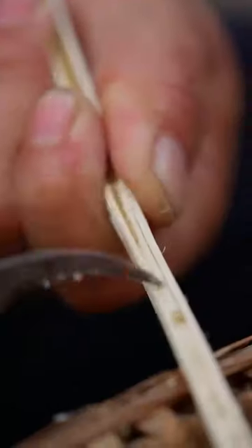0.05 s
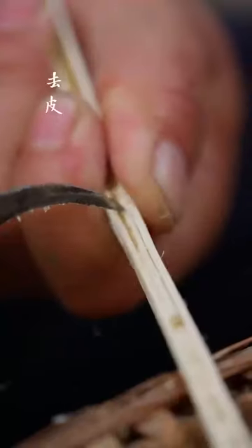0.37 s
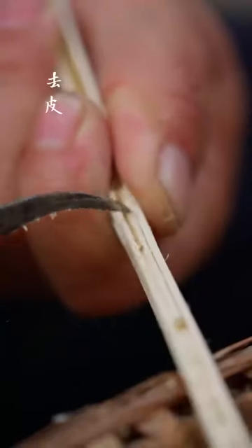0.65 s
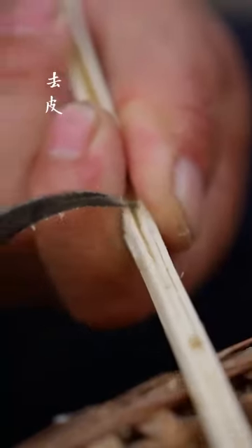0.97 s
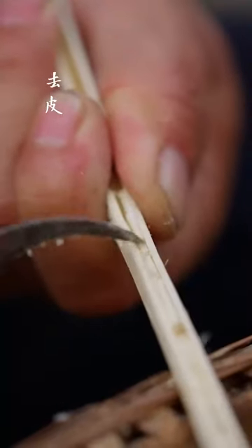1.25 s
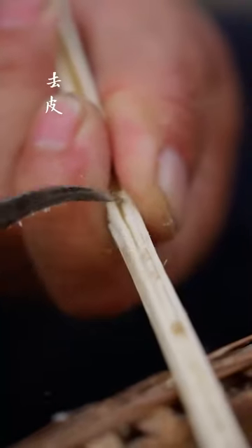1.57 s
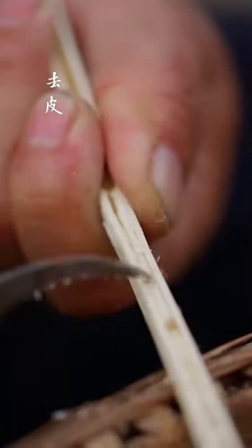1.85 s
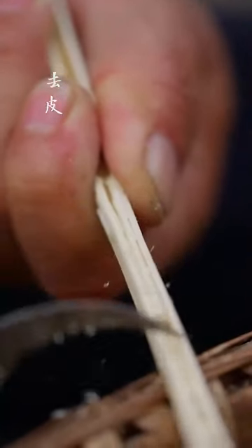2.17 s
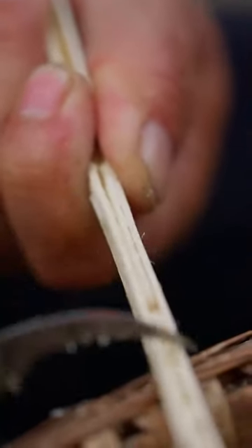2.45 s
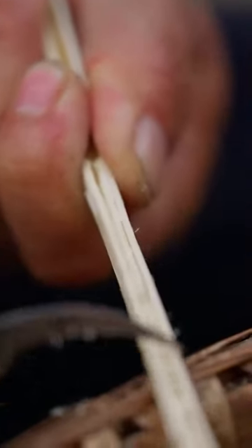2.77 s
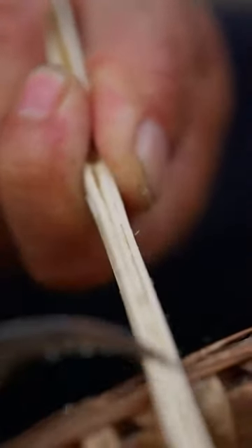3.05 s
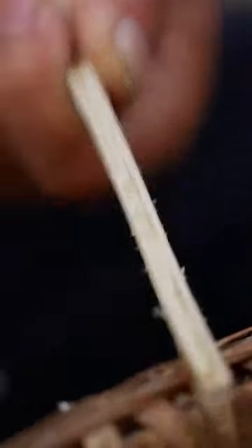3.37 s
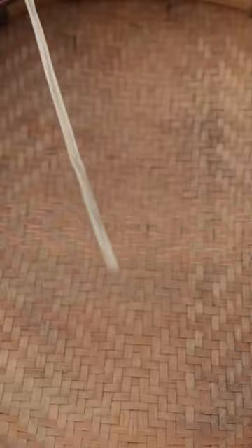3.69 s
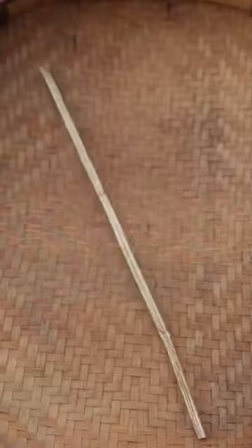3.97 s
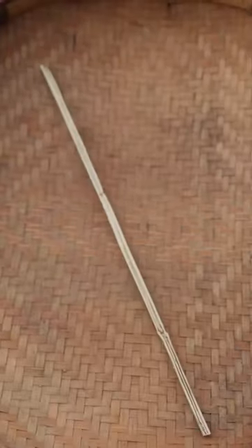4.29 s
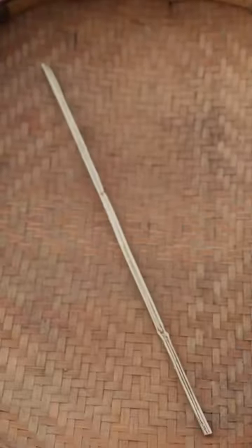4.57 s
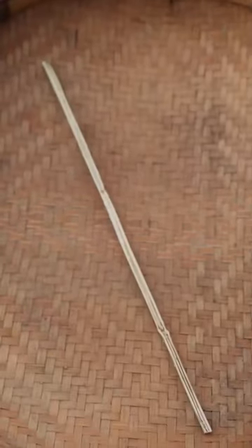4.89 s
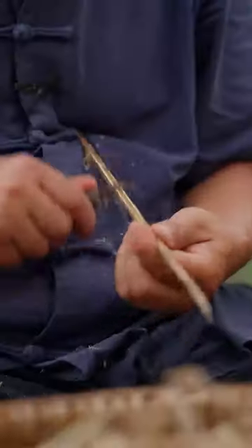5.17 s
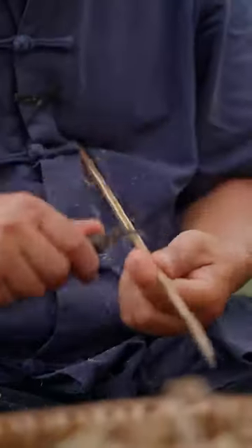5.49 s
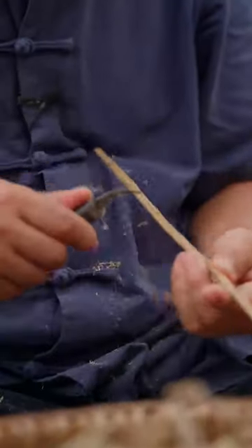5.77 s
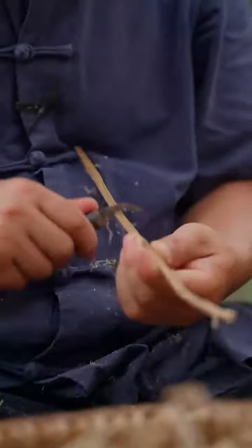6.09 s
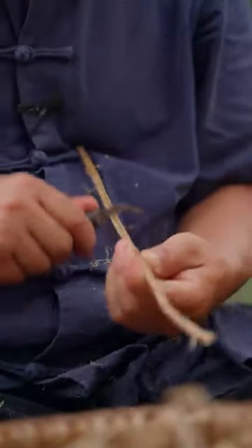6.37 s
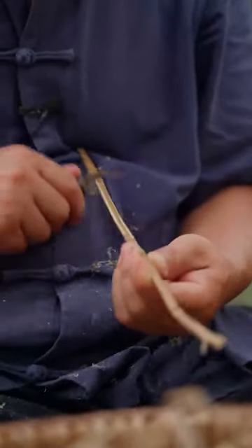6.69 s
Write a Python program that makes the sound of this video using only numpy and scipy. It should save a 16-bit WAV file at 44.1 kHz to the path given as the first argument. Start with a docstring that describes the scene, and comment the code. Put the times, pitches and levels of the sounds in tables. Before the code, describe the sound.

Small birds chirp in quick series over close, short knife scrapes on a dry stalk, with one sharp clack midway.

```python
"""Shaving a stalk under songbirds

Outdoors, close to the microphone, a small curved knife shaves a dry stalk, tearing and snapping fibres.
The peeled stalk drops on a woven tray with a sharp clack and a rattle; then longer strokes scrape
another stalk and make it groan. Farther off, songbirds whistle in the trees, their notes scattering
back from the foliage over a soft outdoor hiss."""
import sys
import numpy as np
from scipy import signal
from scipy.fft import rfft, irfft, next_fast_len
from scipy.io import wavfile
from scipy.ndimage import uniform_filter1d, map_coordinates

SR = 44100
rng = np.random.default_rng(int(sys.argv[2]) if len(sys.argv) > 2 else 0)


def bounce(signal):
    """Save signal as a 16-bit WAV file at the path given by the first command-line argument."""
    frames = np.transpose(np.atleast_2d(signal))
    limited = np.clip(frames, -1, 1)
    pcm = np.round(limited * 32767).astype(np.int16)
    wavfile.write(sys.argv[1], SR, pcm)


N = 306054
TIME = np.arange(N) / SR

# Outdoor hiss behind the shaving, the drop and the long strokes. Each row: frequency in Hz, gain in dB.
SHAVING_AIR_COLOUR = [(30, -19), (110, -9.5), (300, -9.5), (700, -12), (1100, -17), (2000, -11),
                      (2800, -3.5), (4300, 0.5), (5600, 0), (7000, 1), (8000, -6.5), (9300, -4),
                      (11000, -12.5), (15500, -18)]
DROP_AIR_COLOUR = [(35, -68), (60, -38), (272, -18), (521, -17), (559, -15.5), (738, -6), (849, -4),
                   (1120, -2.5), (2310, -9), (3270, -3.5), (4320, -3), (4850, -0.5), (5710, -7), (6410, -4),
                   (15500, -25)]
STROKING_AIR_COLOUR = [(60, -52.5), (150, -16.5), (300, -10), (600, -7), (1000, 3.5), (2200, 1), (3200, 1),
                       (5000, 8), (7000, 3), (9300, -3.5), (11000, -11), (15500, -23.5)]
# How each hiss comes and goes. Each row: time in seconds, level in dB.
SHAVING_AIR_LEVEL = [(0, -46.5), (1.9, -49.2), (2.7, -48), (3.56, -48.5), (3.57, -88.5)]
DROP_AIR_LEVEL = [(3.555, -83.5), (3.567, -42), (4.3, -41.5), (4.6, -43.5), (5.1, -42), (5.35, -43),
                  (5.6, -58)]
STROKING_AIR_LEVEL = [(5.1, -56), (5.3, -45), (5.8, -47.3), (6.1, -47.5), (6.3, -43), (6.94, -44.5)]
# Swells of thin, high hiss. Each row: peak time in seconds, half-width in seconds, level in dB.
HISS_SWELLS = [(4.34, 0.095, -49), (5.17, 0.089, -47), (5.913, 0.11, -48), (6.70, 0.11, -51)]

# Bird syllables. Each point: offset in seconds, base pitch in Hz, relative level in dB.
SYLLABLES = { "arch": [(-.05, 3500, -19.5), (-.023, 4020, -12), (-.014, 4380, 0), (0, 4700, 2),
             (.011, 4350, -6), (.023, 3400, -23)], "dome": [(-.017, 3844, -15), (-.010, 4400, 0),
             (0, 4670, 1.5), (.011, 4420, -1), (.024, 3600, -13)], "plateau": [(-.016, 4100, -12),
             (-.008, 4520, 0), (0, 4670, 1.5), (.014, 4560, -1), (.026, 4400, -12)],
             "hook": [(-.026, 2920, -5.5), (-.010, 3150, 4.5), (0, 3370, 2), (.009, 3150, -4)],
             "zigzag": [(0, 5800, -13), (.02, 6550, -7), (.04, 6550, -4), (.054, 5900, -4.5),
             (.068, 5680, -5), (.075, 5600, -13)], "warble": [(0, 5950, -14), (.015, 6950, 4),
             (.025, 6400, -8), (.034, 7300, -12), (.061, 7500, -13), (.070, 6650, -1.5), (.083, 5850, -3),
             (.101, 5620, -6), (.111, 5600, -20)], "tsip": [(-.040, 6990, -6), (-.028, 7700, -7),
             (-.019, 7300, -3), (-.013, 5010, -32.5), (-.006, 5770, -3.5), (0, 6950, 2.5),
             (.008, 5820, -3.5), (.014, 5780, -22)], "tick": [(-.016, 4556, -9), (-.007, 4950, -4),
             (0, 6150, 1.5), (.005, 5470, 0)], "slur": [(-.046, 6900, -10), (-.031, 6400, -3),
             (-.022, 5500, -3), (-.012, 4450, -3.5), (0, 3436, -11), (.011, 4583, -8), (.016, 4610, -5),
             (.021, 4500, -13)], "chip": [(-.014, 3820, -3), (-.005, 3450, 2.5), (.006, 2950, -6),
             (.013, 2516, 3)], "dip": [(0, 7700, 0), (.024, 7100, -2), (.042, 7000, -2), (.060, 7700, -2),
             (.076, 7740, -7)], "rise": [(-.12, 1867, 2), (-.065, 1932, -8), (-.025, 2400, 4),
             (-.005, 2750, -2.5), (.004, 3330, -6)]}
# Each syllable's voice. Each row: flutter as a share of pitch, echo send in dB.
VOICING = {"arch": (0.011, -0.24), "dome": (0.0076, -1.85), "plateau": (.01, -1.85), "hook": (0.014, -4.5),
           "zigzag": (0.03, 0.7), "warble": (.014, -0.9), "tsip": (0.018, -2), "tick": (.008, -1),
           "slur": (.017, -0.5), "chip": (0.008, -1.5), "dip": (0.014, 0), "rise": (0.0392, 2.67)}
# Brief, fast pitch swings. Each row: offset of the widest swing and half-width in seconds, base depth in Hz.
VIBRATO = {"zigzag": (.011, .024, 1250), "warble": (.044, .019, 1000), "slur": (-.046, .018, 550),
           "dip": (0, .02, 550)}
# Harmonics of a whistle. Each row: multiple of the pitch, relative level in dB.
HARMONICS = [(1, 0), (2, -29), (3, -25)]
# The notes of each song. Each row: syllable, offset in seconds, pitch ratio, ratio added at full effort,
# relative level in dB, dB added at full effort, pan (left minus right) in dB, time stretch.
MOTIFS = { "arches": [("arch", .001, .97, .04, 0, 0, 5.3, 1), ("hook", .057, .84, .25, -20, 13.5, 1.5, .95),
          ("zigzag", .146, .88, .135, -.2, .3, 0, 1)],
          "stairs": [("dome", -.039, .745, .135, -7, 1, 4, .84), ("dome", 0, .95, .025, .3, -.5, 6, 1),
          ("plateau", .041, 1.04, 0, -1, -2, .5, 1.1), ("warble", .144, .995, -.01, -.7, 3.2, 0, 1)]}
# Phrases sung. Each row: time in seconds, effort from 0 to 1, level in dB, pan in dB, time stretch,
# number of notes.
PHRASES = { "arches": [(.026, .25, -25.7, 1, .9, 3), (.331, .6, -24.8, -.5, .98, 3),
           (.647, .78, -25.8, -2.5, 1.01, 3), (.966, .95, -26, 1, 1.02, 3), (1.298, .5, -27.5, 4, 1.02, 3),
           (1.638, .05, -30.3, 3, .9, 2)], "stairs": [(5.360, 1, -30, -2, 1, 4),
           (5.738, .8, -29, 4, .97, 4), (6.107, .25, -27.6, 2, 1.01, 4), (6.487, .1, -30, -1, 1.03, 4)]}
# Trills. Each row: syllable, start in seconds, number of notes, first gap and its growth per note in
# seconds, first and last pitch ratio, first and last level in dB, pan in dB, time stretch.
TRILLS = [("tsip", 2.757, 5, .114, -.003, 1.005, .965, -44, -31, -2.3, .92),
          ("tick", 3.265, 4, .0505, .001, 1.01, 1.045, -37.5, -36, -3.5, .9),
          ("slur", 3.510, 9, .101, .0006, 1, .965, -30, -30.3, -2.3, .98),
          ("chip", 4.406, 10, .0558, .00045, 1, .8, -40, -45.5, 1.5, .85)]
# Lone calls. Each row: syllable, time in seconds, pitch ratio, level in dB, pan in dB, time stretch.
LONE_CALLS = [("rise", 4.200, .9, -49, 20, .69), ("zigzag", 4.992, .96, -32, 0, .62),
              ("rise", 5.016, 1.015, -52, 29, 1), ("plateau", 5.055, 1.1, -36, 0, 1.1),
              ("dip", 5.143, 1, -36.5, 2.5, .97), ("plateau", 5.203, 1.26, -37, .5, .8),
              ("rise", 5.788, 1, -50.5, 24, .92), ("plateau", 5.808, 1.04, -35.5, 11, .7)]
# Birdsong coming back off ground and walls. Each row: delay in seconds, gain in dB.
REFLECTIONS = [(.0021, -17.5), (.0093, -10.5), (0.018, -15.5)]

# Hands shift their grip and brush the clothes.
# Each row: time in seconds, half-width in seconds, pitch in Hz, relative level in dB.
GRIPS = [(.735, .011, 113, -55.5), (1.770, .0096, 141, -56.5), (3.025, .018, 86.6, -54),
         (3.065, .026, 135, -52), (3.295, .023, 85.5, -48), (5.250, .02, 265, -51), (5.356, .021, 271, -49)]
# Resonances of stalk on tray. Each row: frequency in Hz, relative level in dB, seconds to fall 60 dB.
TRAY_MODES = [(598, -15.5, 0.11), (930, -7, 0.095), (1190, -12, .05), (1418, -1, 0.056), (1520, -2, 0.058),
              (1690, 0, 0.054), (1830, -2, 0.042), (1990, -2, 0.033), (2222, 0.5, 0.038), (2530, -9, 0.041),
              (2690, -6.5, 0.03), (2750, -1, 0.041), (3080, -17, 0.022), (4130, 3.5, 0.011),
              (4700, -2.5, 0.016)]
# The stalk grazes the tray and lands, then rebounds.
# Each row: time in seconds, level in dB, treble tilt in dB.
LANDING_BLOWS = [(3.842, -33.5, -3), (3.9386, -12, 0.5), (3.9472, -6.3, 1), (3.9503, -7.6, 1),
                 (3.9555, -17, 7)]
REBOUNDS = [(3.975, -26, -5), (4.011, -24, -12), (4.079, -34, -16)]
# Spectra of the tray's clack, a snapping fibre, a short shave and a long stroke.
# Each row: frequency in Hz, gain in dB.
CLACK_COLOUR = [(60, -36.5), (300, -27), (550, -13), (800, 5), (1600, 6), (2900, 6.5), (3600, -6),
                (5000, -6.5), (8000, -15), (15500, -30)]
SNAP_COLOUR = [(40, -27), (200, -16.5), (500, -8.5), (800, -0.5), (1200, -4.5), (1700, 2.5), (2500, -1.5),
               (4000, 6.5), (7000, -8), (9300, 1.5), (11000, -17), (15500, -21)]
SHAVE_COLOUR = [(30, -23), (100, -9), (300, -6.5), (700, -1), (1200, 3.5), (1700, 5.5), (2400, 1.5),
                (4000, 8.5), (7000, 0.5), (9300, 10.5), (11000, -4.5), (15500, -7)]
STROKE_COLOUR = [(200, -39), (500, -16), (1100, -7.5), (1800, -7.5), (2500, -9), (2950, 5.5), (4000, -0.5),
                 (5500, -7.5), (7500, -2.5), (9200, -1.5), (11000, -14), (15500, -14)]
# The thickest fibres snap under the blade. Each row: time in seconds, level in dB, treble tilt in dB.
SNAPS = [(.120, -35, -20), (.161, -30, 2), (.438, -34, -3), (.446, -31, -6.5), (.529, -39, -18),
         (.673, -32, -9), (.729, -38, -5), (.993, -37, 0), (1.0495, -26.5, -5), (1.189, -32, -5),
         (1.199, -32, -5), (1.291, -29, -5.5), (1.328, -31, -2), (2.1015, -24.5, -8), (2.479, -32, 6),
         (2.5777, -22, 7), (5.243, -34, -13), (5.352, -39, -16), (5.561, -32.5, 4)]
# Short shaves on the first stalk. Each row: peak time in seconds, rise in seconds, level in dB,
# treble tilt in dB, relative level of the hands' jolt in dB.
SHAVES = [(.045, .04, -39.5, -4, -56.5), (.168, .036, -42, -2.5, -60), (.247, .037, -39, -2.5, -56),
          (.467, .028, -40.5, -2.5, -57), (.566, .032, -44, -5, -57), (.660, .033, -40.5, -4.5, -52),
          (1.078, .034, -45, -3.5, -53.5), (1.194, .018, -43, -5.5, -52), (1.320, .032, -45.5, -7.5, -54),
          (1.523, .028, -50.5, -7, -62.5), (1.715, .06, -51, -4, -57), (2.120, .028, -44.5, -7, -52),
          (2.494, .021, -49.5, -1, -59), (2.590, .031, -36.5, -4, -60), (2.767, .029, -55, -30, -63),
          (3.280, .032, -45.5, -12, -56)]
# Loose strokes on the second stalk.
# Each row: peak time in seconds, rise in seconds, level in dB, treble tilt in dB.
LOOSE_STROKES = [(5.255, .018, -45, -18), (5.294, .032, -38, 6), (5.385, .055, -45, -14),
                 (5.549, .024, -42, 4)]
# Firm pushes that make it groan.
# Each row: peak time in seconds, rise in seconds, level in dB, groan pitch in Hz, groan level in dB.
PUSHES = [(6.135, .014, -37.5, 567, -47), (6.396, .031, -35.5, 620, -38.5), (6.670, .04, -36, 630, -37.5),
          (6.929, .045, -37, 650, -40)]
# Its bending resonances. Each row: ratio to the groan pitch, relative level in dB.
GROAN_PARTIALS = [(0.999, -1.5), (1.952, -11), (3.05, -8)]


def undb(db):
    """Decibels to gain."""
    return 10 ** (np.asarray(db) / 20)


def unit(x):
    """Scale to rms 1."""
    return x / np.sqrt(np.mean(x ** 2) + 1e-30)


def add(out, s, x):
    """Mix x into out from s seconds on."""
    start = int(round(s * SR))
    a, b = max(start, 0), min(start + x.shape[-1], N)
    out[..., a:b] += x[..., a - start:b - start]


def colour(x, points, treble_db=0):
    """Minimum-phase filter through (Hz, dB) points, tilted about 3 kHz."""
    size = 2 * next_fast_len(x.shape[-1] // 2 + 4096, True)
    hz = np.maximum(np.arange(size // 2 + 1) * SR / size, 1)
    point_hz, db = np.transpose(points)
    tilt_db = treble_db * np.tanh(np.log(hz / 3000))
    gain = undb(np.interp(np.log(hz), np.log(point_hz), db) + tilt_db)
    cepstrum = irfft(np.log(gain))
    cepstrum[1:size // 2] *= 2
    cepstrum[size // 2 + 1:] = 0
    return irfft(rfft(x, size) * np.exp(rfft(cepstrum)))[..., :x.shape[-1]]


def wander(n, rate):
    """Smooth random motion through rate random values a second."""
    steps = np.arange(n) * rate / SR
    return map_coordinates(rng.standard_normal(int(steps[-1]) + 2), [steps], order=3, mode="nearest")


def resonance(hz, width_hz):
    """A resonance kept ringing by random pushes; its centre may move."""
    phase = 2 * np.pi * np.cumsum(hz) / SR
    return wander(len(hz), width_hz) * np.cos(phase) + wander(len(hz), width_hz) * np.sin(phase)


def panned(x, pan_db):
    """Place a mono sound; positive is to the microphone's left."""
    return x * undb(np.array([[pan_db], [-pan_db]]) / 2)


def crack(points, treble_db, t60):
    """A noise burst that dies at once, with the energy of about a millisecond at rms 1."""
    t = TIME[:4096]
    burst = rng.standard_normal(len(t)) * undb(-60 * t / t60)
    return unit(colour(burst, points, treble_db)) * np.sqrt(0.00094 * SR / len(t))


def air(points, levels, flicker_db):
    """Outdoor hiss all round: centred in the midrange, wider in the bass and treble."""
    side_colour = [(100, -6), (600, -33.5), (1500, -48), (3200, -7),
                   (5000, -9), (7500, -17.5), (10000, -9), (14000, -8.5)]
    mid, side = colour(rng.standard_normal((2, N)), points)
    side = colour(side, side_colour)
    gain = undb(np.interp(TIME, *np.transpose(levels)) + flicker_db * wander(N, 25))
    return gain * unit(np.array([mid + side, mid - side]))


def high_hiss():
    """A thin hiss at the very top comes and goes, off to the left."""
    swell = sum(undb(db) * np.exp(-((TIME - s) / width) ** 2) for s, width, db in HISS_SWELLS)
    hiss = colour(rng.standard_normal((2, N)), [(7000, -46), (10500, -9), (13500, -7), (15500, -3.5)])
    return panned(unit(hiss) * swell, pan_db=11.5)


def syllable(name, ratio, stretch, flutter, vibrato_hz=88):
    """One gliding, fluttering whistle with faint overtones; returns its start offset and sound."""
    knots, pitch, level_db = np.transpose(SYLLABLES[name])
    knots = np.sort(knots) * stretch
    t = np.arange(knots[0], knots[-1], 1 / SR)
    hz = uniform_filter1d(np.interp(t, knots, pitch), size=130)
    if name in VIBRATO:
        widest, width, depth_hz = VIBRATO[name]
        since = t - widest * stretch
        hz += depth_hz * np.exp(-(since / width) ** 4) * np.cos(2 * np.pi * vibrato_hz * since)
    hz = ratio * hz * (1 + flutter * wander(len(t), 900))
    phase = 2 * np.pi * np.cumsum(hz) / SR
    flicker_db = 1.66 * wander(len(t), 209)
    swell = undb(np.interp(t, knots, level_db) + flicker_db) * signal.windows.tukey(len(t), .08)
    # the bird's throat and the air on the way take away the highest overtones
    tone = sum(undb(db) * np.sin(k * phase) / (1 + (k * hz / 13500) ** 20) for k, db in HARMONICS)
    return knots[0], swell * tone


def phrase_notes():
    """Each song repeats its motif, effort shifting pitch and level; rows as in LONE_CALLS."""
    notes = []
    for song, phrases in PHRASES.items():
        for s, effort, db, pan_db, stretch, count in phrases:
            for name, lag, ratio, lift, note_db, lift_db, note_pan, note_stretch in MOTIFS[song][:count]:
                notes.append((name, s + lag * stretch, ratio + lift * effort,
                              db + note_db + lift_db * effort, pan_db + note_pan, stretch * note_stretch))
    return notes


def trill_notes():
    """One syllable repeats while pace, pitch and level drift evenly; rows as in LONE_CALLS."""
    notes = []
    for name, s, count, gap, slowing, first_ratio, last_ratio, first_db, last_db, pan, stretch in TRILLS:
        drift = np.linspace((first_ratio, first_db), (last_ratio, last_db), count)
        for k, (ratio, db) in enumerate(drift):
            onset = s + k * gap + slowing * k * (k - 1) / 2
            notes.append((name, onset, ratio, db, pan, stretch))
    return notes


def scatter(x, t60, build_s):
    """Diffuse echoes off foliage, unrelated left and right."""
    t = TIME[:SR]
    build_up = 1 - np.exp(-(t / build_s) ** 2)
    tail = rng.standard_normal((2, SR)) * undb(-60 * t / t60) * build_up
    return signal.fftconvolve(x[None], unit(tail) / np.sqrt(SR), axes=1)[:, :N]


def birds(direct_db=-1.6):
    """Song reaches the microphone directly, off ground and walls, off near leaves and, late, off trees."""
    early, sent = np.zeros((2, N)), np.zeros(N)
    for name, s, ratio, db, pan_db, stretch in phrase_notes() + trill_notes() + LONE_CALLS:
        flutter, echo_db = VOICING[name]
        offset, whistle = syllable(name, ratio, stretch, flutter)
        add(early, s + offset, panned(undb(db + direct_db) * whistle, pan_db))
        add(sent, s + offset, undb(db + echo_db) * whistle)
    for delay, db in REFLECTIONS:
        add(early, delay, undb(db) * sent)
    centre = undb(-12) * scatter(sent, t60=.33, build_s=.00273)[0]
    leaves = undb(-3.8) * scatter(sent, t60=.22, build_s=.004)
    woods = undb(-13) * scatter(sent, t60=.6, build_s=.025)
    return early + centre + leaves + woods


def hands(jolt_hz=106, jolt_width_s=.024, jolt_lag_s=.005, bandwidth_share=.6884):
    """Hands and sleeves thump softly with each shave and each change of grip."""
    out = np.zeros(N)
    jolts = [(s + jolt_lag_s, jolt_width_s, jolt_hz, db) for s, *_, db in SHAVES]
    for s, width, hz, db in jolts + GRIPS:
        t = np.arange(-3 * width, 3 * width, 1 / SR)
        thump = resonance(np.full(len(t), hz), bandwidth_share * hz) / np.cosh(1.86 * t / width)
        add(out, s + t[0], undb(db) * unit(thump) / 2)
    return out


def chatter(taps=5, gap_s=.008, jitter_s=.0015, loss_db=2):
    """After each rebound the stalk taps the weave unevenly, weaker every time; rows as in REBOUNDS."""
    return [(s + k * gap_s + jitter_s * rng.standard_normal(), db - k * loss_db, treble_db)
            for s, db, treble_db in REBOUNDS for k in range(taps)]


def landing(ring_db=-4, crack_db=-1, low_cut_hz=400):
    """One end of the stalk hits the tray, then the other, and it chatters to rest."""
    out, t = np.zeros(N), TIME[:6000]
    hz, mode_db, t60 = np.transpose(TRAY_MODES)[:, :, None]
    modes = np.sin(2 * np.pi * hz * t) * undb(-60 * t / t60)
    for s, db, treble_db in LANDING_BLOWS + chatter():
        # each blow weights the modes anew
        weight = undb(mode_db + rng.standard_normal(hz.shape)) * rng.choice([-1, 1], hz.shape)
        ring = np.sum(weight * modes, axis=0) / np.sqrt(np.sum(weight ** 2) / 2)
        add(out, s, undb(db + ring_db) * ring)
        add(out, s, undb(db + crack_db) * crack(CLACK_COLOUR, treble_db, t60=.016))
    # the light open weave radiates little bass
    return signal.sosfilt(signal.butter(2, low_cut_hz, "high", fs=SR, output="sos"), out)


def groans(sink_per_s=3.3, width_hz=150, push_share=.8):
    """The stalk's bending resonances sink as the blade slides and frees a longer stretch."""
    out = np.zeros(N)
    for s, rise, _, hz, db in PUSHES:
        width = push_share * rise
        t = np.arange(-3 * width, 3 * width, 1 / SR)
        pitch = hz * np.exp(-sink_per_s * t)
        ring = sum(undb(partial_db) * unit(resonance(pitch * ratio, width_hz * ratio))
                   for ratio, partial_db in GROAN_PARTIALS)
        add(out, s + t[0], undb(db) * ring / np.cosh(1.94 * t / width))
    return out


def snaps(tear_lag_s=.002, tear_db=-8.5):
    """A fibre cracks under the blade, and the rest of it gives way just after."""
    out = np.zeros(N)
    for s, db, treble_db in SNAPS:
        add(out, s, undb(db) * crack(SNAP_COLOUR, treble_db, t60=.011))
        add(out, s + tear_lag_s, undb(db + tear_db) * crack(SNAP_COLOUR, treble_db, t60=.016))
    return out


def long_strokes(push_treble_db=-3, return_rise_s=.052, return_db=-37.7, return_treble_db=-2.2):
    """Loose strokes, then firm pushes with the blade drawn back between; rows as in LOOSE_STROKES."""
    pushes = [(s, rise, db, push_treble_db) for s, rise, db, *_ in PUSHES]
    returns = [((before[0] + after[0]) / 2, return_rise_s, return_db, return_treble_db)
               for before, after in zip(PUSHES, PUSHES[1:])]
    return LOOSE_STROKES + pushes + returns


def scrape(strokes, points, grains_per_s, spread_db, judder_db, fall_share=.92):
    """The blade tears through fibres: dense tiny clicks of uneven size, bunched by stick and slip."""
    out = np.zeros(N)
    for s, rise, db, treble_db, *_ in strokes:
        fall = fall_share * rise
        t = np.arange(-2.5 * rise, 1.8 * fall, 1 / SR)
        push = np.exp(-(t / np.where(t < 0, rise, fall)) ** 2)
        sizes = undb(spread_db * np.minimum(rng.exponential(size=len(t)), 4))
        grains = (rng.random(len(t)) < grains_per_s / SR) * rng.choice([-1, 1], len(t)) * sizes
        judder = undb(judder_db * wander(len(t), 174))
        add(out, s + t[0], undb(db) * push * unit(colour(grains * judder, points, treble_db)))
    return out


def scene():
    """Handiwork close to the microphone, dry and central; birds and air all around."""
    shaving = scrape(SHAVES, SHAVE_COLOUR, grains_per_s=2200, spread_db=4.2, judder_db=2.5)
    stroking = scrape(long_strokes(), STROKE_COLOUR, grains_per_s=7000, spread_db=3, judder_db=1.5)
    handiwork = shaving + stroking + snaps() + groans() + hands() + landing()
    outdoors = (air(SHAVING_AIR_COLOUR, SHAVING_AIR_LEVEL, flicker_db=2)
                + air(DROP_AIR_COLOUR, DROP_AIR_LEVEL, flicker_db=1.28)
                + air(STROKING_AIR_COLOUR, STROKING_AIR_LEVEL, flicker_db=1.24))
    return handiwork + birds() + outdoors + high_hiss()


def record(dry):
    """The recorder cuts the very top."""
    top_hz = 15850
    return signal.sosfilt(signal.ellip(10, .2, 70, top_hz, fs=SR, output="sos"), dry)


dry = scene()
out = record(dry)
bounce(out)
```